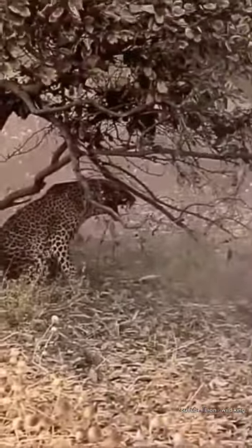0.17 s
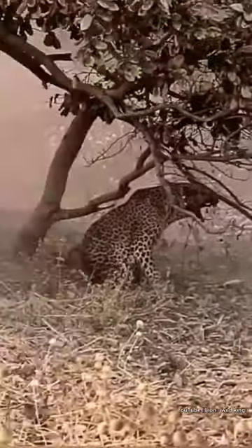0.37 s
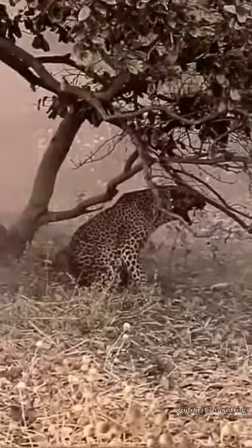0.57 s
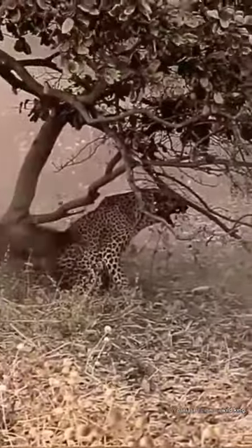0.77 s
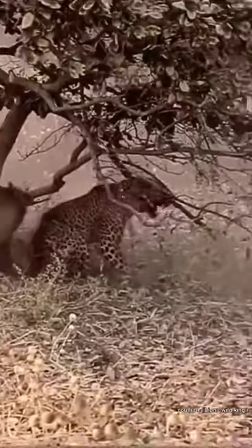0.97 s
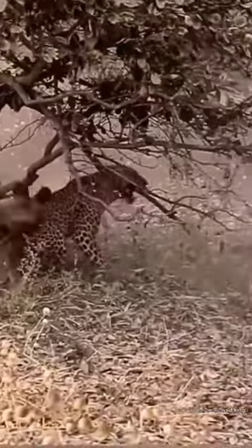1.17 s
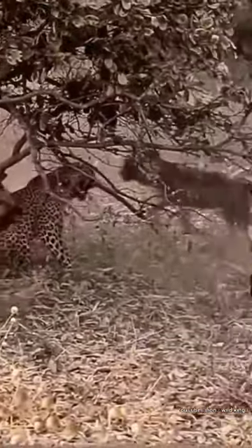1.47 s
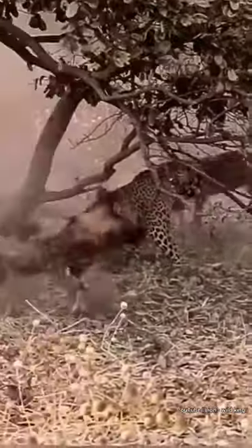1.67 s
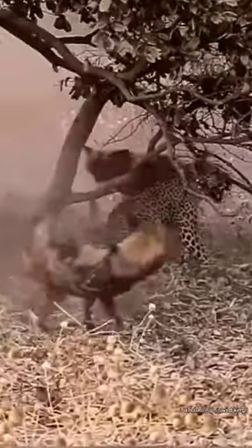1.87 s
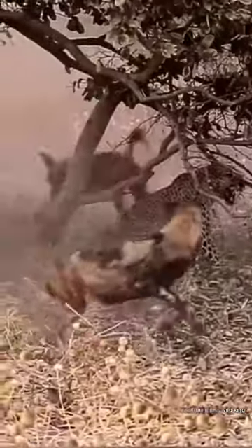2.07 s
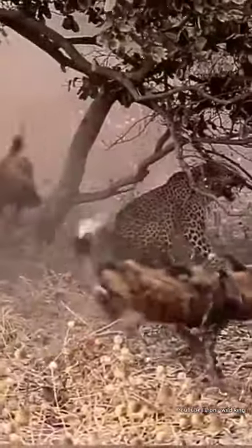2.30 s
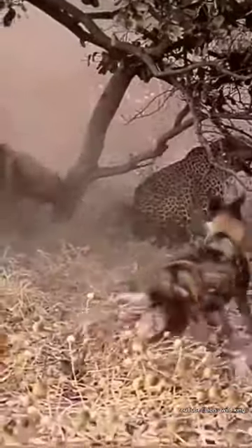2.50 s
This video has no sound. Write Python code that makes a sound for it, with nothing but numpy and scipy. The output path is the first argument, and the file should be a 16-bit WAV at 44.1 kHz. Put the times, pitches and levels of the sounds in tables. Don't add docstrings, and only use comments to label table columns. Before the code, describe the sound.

A pack of wild dogs whimpers, whistles, yelps and yaps in quick shrill bursts, with one wavering whine, then a low pulsing cat growl; paws scuff dry grass, open bush, phone microphone some distance away.

```python
import sys
import numpy as np
from scipy import signal
from scipy.io import wavfile
from scipy.ndimage import uniform_filter1d

SR = 44100
rng = np.random.default_rng(int(sys.argv[2]) if len(sys.argv) > 2 else 0)


def dump_mix(stems):
    frames = np.atleast_2d(stems).T
    limited = np.clip(frames, -1, 1)
    pcm = np.round(limited * 32767).astype(np.int16)
    wavfile.write(sys.argv[1], SR, pcm)


def magnitude_from_level(level_db):
    exponent = np.asarray(level_db, float) / 20
    return 10 ** exponent


N = 116424

# (frequency [Hz], density [dB per Hz])
BUSH_SPECTRUM = [(25, -33), (150, -12), (550, -15), (1300, -4.5), (3900, -13.5), (8600, -9.5),
                 (11500, -5.5), (15500, -43)]
# (time [s], length [s], centre [Hz], level [dB])
RASPS = [(.0, 0.25, 8740, -39.5), (0.391, 0.31, 8930, -42), (1.03, 0.087, 8580, -42.5),
         (0.821, 0.19, 8340, -33.5), (1.131, 0.19, 8560, -33), (1.598, 0.1, 8000, -35),
         (1.719, 0.067, 10800, -38.5), (1.957, 0.279, 8550, -36.5), (2.25, 0.11, 7700, -31),
         (2.362, 0.069, 6510, -28), (2.509, 0.21, 9100, -33)]
# (time [s], length [s], start [Hz], end [Hz], level [dB])
WHIMPERS = [
    (0., 0.04, 964, 900, -22.5),
    (0.106, 0.056, 1055, 924, -23.5),
    (0.525, 0.033, 970, 947, -20.5),
    (2.259, 0.046, 1372, 1444, -20.5),
    (1.865, 0.053, 350, 325, -42),
    (2.3, .04, 1402, 1257, -26.5),
    (2.515, .02, 1190, 1000, -21),
    (2.339, 0.0586, 1016, 1237, -32),
    (2.402, 0.066, 1089, 1057, -30.5),
    (2.485, .11, 899, 997, -28.5),
]
# (time [s], length [s], start [Hz], end [Hz], level [dB])
HIGH_WHISTLES = [(.05, 0.052, 9200, 9210, -19), (.16, 0.015, 7000, 11270, -19),
                 (.2, 0.021, 11560, 5280, -23.5), (.24, 0.0088, 6900, 9700, -4.5),
                 (.47, 0.018, 9580, 7250, -20), (.488, 0.017, 7200, 10470, -17.5),
                 (.795, 0.042, 8010, 9580, -20), (.93, 0.029, 8650, 8700, -18.5),
                 (1.155, 0.11, 7900, 7600, -45), (1.33, 0.021, 9740, 6840, -14.5),
                 (1.7, 0.04, 7500, 9120, -17.5), (2.005, 0.028, 7960, 9120, -11.5),
                 (2.5, 0.034, 9150, 11500, -30), (.125, 0.045, 10500, 10200, -31.5),
                 (.17, 0.033, 10900, 11600, -32.5), (.235, .04, 10600, 9650, -29.5),
                 (.268, 0.022, 9000, 9070, -29.5), (.405, 0.062, 8500, 11970, -28),
                 (.515, 0.061, 11370, 11000, -33), (.595, 0.026, 12200, 12100, -42),
                 (.638, 0.014, 5550, 8900, -26), (.66, 0.023, 7500, 9330, -30),
                 (.82, 0.045, 9200, 9400, -27.5), (1.145, .025, 9250, 8270, -23),
                 (1.21, 0.039, 8230, 7530, -24), (1.23, 0.025, 9300, 9900, -25),
                 (1.365, 0.043, 14600, 9900, -43), (1.81, 0.1, 8300, 8700, -41),
                 (1.705, 0.032, 6750, 5880, -20), (1.995, .06, 5710, 6530, -20)]
# (time [s], length [s], start [Hz], end [Hz], level [dB])
LOW_WHISTLES = [(.21, 0.03, 5360, 5210, -28.5), (.09, 0.032, 6200, 6000, -27),
                (.13, 0.044, 5200, 5430, -33), (.508, 0.02, 6000, 6040, -32),
                (.975, 0.033, 5400, 5340, -29), (1.6, 0.046, 6340, 6390, -40.5),
                (1.79, 0.044, 6170, 6350, -35), (2.08, 0.078, 5000, 5020, -34.5),
                (.885, 0.036, 5200, 5200, -27.5), (.97, 0.054, 7000, 5400, -31),
                (1.185, 0.2, 5160, 5290, -37), (1.73, 0.0607, 5560, 5340, -24.5),
                (2.055, 0.061, 5360, 5490, -21), (2.2, 0.073, 5050, 5380, -25.5),
                (2.36, 0.05, 5490, 5530, -18.5), (2.55, 0.073, 5360, 5075, -29.5)]
# (time [s], start [Hz], level [dB])
SQUEAKS = [
    (0.076, 8350, -18),
    (.325, 8900, -30),
    (0.755, 8380, -11.5),
    (0.99, 5430, -19),
    (1.541, 7960, -15.5),
    (1.617, 8100, -19.5),
    (1.95, 7550, -16),
]
# (time [s], length [s], top [Hz], level [dB])
YELPS = [
    (0.087, 0.036, 1402, -18.5),
    (0.337, 0.052, 1710, -20.5),
    (0.767, 0.056, 1893, -17),
    (1.163, 0.046, 1804, -14.5),
    (1.283, 0.04, 1400, -20),
    (1.552, 0.055, 1884, -15.5),
    (1.633, 0.035, 1401, -20),
    (2.609, 0.022, 1577, -15.5),
]
# (frequency [Hz], level [dB])
THROAT = [(450, -20), (800, -6), (1200, 0), (2200, 0), (4000, -12), (6000, -20), (9000, -50)]
# (time [s], peak [dB])
THUDS = [(.122, -39.5), (.22, -43), (.80, -41), (.835, -39.5), (.87, -37), (.905, -37), (1.775, -39),
         (1.925, -47), (2.0, -39), (2.095, -40), (2.18, -44), (2.309, -33), (2.375, -45), (2.409, -38.5),
         (2.5, -43), (2.548, -39), (2.615, -35)]
# (frequency [Hz], level [dB], t60 [s])
THUD_MODES = [(122, -0.5, 0.077), (166, -11, 0.086), (293, -0.5, 0.059)]
# (time [s], length [s], start [Hz], end [Hz], level [dB])
YAPS = [(.163, 0.03, 1072, 1033, -16), (0.441, .025, 1154, 955, -14.5), (0.835, 0.034, 742.5, 691, -16.5),
        (0.866, 0.047, 641, 596.4, -18.5), (1.349, 0.028, 938, 896, -16.5),
        (1.66, 0.046, 611.4, 531, -19.5), (1.73, 0.032, 950, 1101, -19), (2.626, 0.015, 1530, 1460, -11.5),
        (1.944, 0.048, 1850, 904, -18.5), (2.036, 0.056, 1090, 830, -18), (2.241, 0.043, 1400, 918, -15.5)]
# (time [s], length [s], start [Hz], end [Hz], level [dB])
DULL_YAPS = [
    (0.2343, 0.037, 700, 615, -17.5),
    (0.925, 0.0475, 710, 580, -18.5),
    (2.14, 0.041, 560, 490, -23.5),
    (.852, 0.023, 750, 1000, -20),
    (1.0, 0.0304, 1200, 1350, -33),
]
# (time [s], length [s], pitch [Hz], level [dB])
BARKS = [
    (0.437, 0.0665, 898, -21),
    (0.801, 0.034, 855, -27),
    (1.665, 0.028, 1005, -22.5),
    (0.943, 0.04, 898.4, -19.5),
    (1.257, 0.037, 869.5, -22),
    (1.74, 0.031, 802, -24),
    (1.969, 0.029, 1373, -22),
]
# (time [s], pitch [Hz], level [dB])
WHINE = [
    (.485, 714, -19.5),
    (0.524, 677, -15.5),
    (.565, 713.6, -18.5),
    (.6, 698.6, -21),
    (0.624, 648.3, -20),
    (.665, 665, -13),
    (0.699, 722.6, -17),
    (0.734, 771.5, -15.5),
    (.775, 740, -23),
]
# (time [s], level [dB])
STALK_SNAPS = [(1.010, -27), (1.070, -24.5), (1.104, -28), (1.124, -28), (1.146, -30), (1.862, -25),
               (.609, -34), (.63, -35), (2.228, -24)]
# (time [s], peak [dB])
GROWL = [(1.210, -34), (1.251, -30), (1.300, -26.5), (1.352, -38), (1.390, -26), (1.441, -27.5),
         (1.479, -26), (1.534, -27.5), (1.589, -28.5), (1.655, -29.5), (1.722, -39)]
# (frequency [Hz], level [dB], t60 [s])
GROWL_MODES = [(196, 3.5, 0.041), (350, -4, 0.061)]

BUSH_DB = -35.5
STIR_SHARE = 0.33
ATTACK_S, RELEASE_S, FLUTTER_DB = .008, .008, 2.
TWITTER_SPREAD, TWITTER_DB, TWITTER_ROUGH = .11, -2, .55
SQUEAK_S, SQUEAK_TOP_HZ, SQUEAK_FADE_DB = 0.033, 15500, -36.5
BREATH_DB, EFFORT_DB_PER_OCTAVE = -23, 5
DULLING_DB_PER_OCTAVE = 18
RISE_S = 0.00496
YELP_END_HZ, YELP_SAG_POWER = 789, 3.5
STRAIN_HZ = 1650
TWIG_S, TWIG_DB = .5, -14
SCATTER_GAP_S, SCATTER_T60_S, SCATTER_DB = .004, .17, -10


def walk(rate, size=N):
    k = max(int(SR / rate), 2)
    steps = np.repeat(rng.standard_normal(size // k + 1), k)
    return 1.67 * uniform_filter1d(uniform_filter1d(steps, k), k)[:size]


def read(table, hz):
    table_hz, table_db = np.array(table).T
    return np.interp(np.log(hz), np.log(table_hz), table_db)


def band(x, lo_hz, hi_hz):
    sos = signal.butter(2, [lo_hz, min(hi_hz, .45 * SR)], "band", fs=SR, output="sos")
    return signal.sosfilt(sos, x)


def unit(x):
    return x / np.sqrt(np.mean(x ** 2))


def clock(length):
    return np.arange(int(length * SR)) / SR


def add(out, start, x):
    i = max(int(start * SR), 0)
    out[i:i + len(x)] += x[:N - i]


def swell(t, flutter_db):
    edge = np.clip(t / ATTACK_S, 0, 1) * np.clip((t[-1] - t) / RELEASE_S, 0, 1)
    return np.sin(np.pi / 2 * edge) ** 2 * magnitude_from_level(flutter_db * walk(90.2, size=len(t)))


def ragged(rough, rate, size):
    return 1 - rough + rough * (walk(rate, size=size) + 1j * walk(rate, size=size))


def ground(pack):
    loudness = uniform_filter1d(unit(pack) ** 2, size=3000)
    stir_db = STIR_SHARE * 10 * np.log10(loudness + 0.014)
    out, slow_db = 0, walk(1.88)
    for hz in 25 * 2 ** np.arange(0, 9.4, .5):
        db = read(BUSH_SPECTRUM, hz) + 10 * np.log10(hz)
        db = db + min(hz / 1000, 1) * stir_db + slow_db + 2 * walk(4) + 2.5 * walk(18)
        out = out + magnitude_from_level(db) * unit(band(rng.standard_normal(N), hz / 1.157, hz * 1.066))
    return magnitude_from_level(BUSH_DB) * unit(out)


def whistle(hz, jitter, rough):
    n = len(hz)
    phase = 2 * np.pi * np.cumsum(hz * (1 + jitter * walk(125, size=n))) / SR
    return unit(np.real(ragged(rough, 900, n) * np.exp(1j * phase)))


def rasps(out):
    for start, length, hz, db in RASPS:
        t = clock(length)
        hiss = band(rng.standard_normal(len(t)), hz * 0.84, hz * 1.16)
        hiss = unit(band(hiss, hz * 0.28, hz * 3.8))
        add(out, start, magnitude_from_level(db) * swell(t, 0.65) * hiss)
        for shift in (.8, 1, 1.17):
            flip = np.tanh(3 * walk(70, size=len(t)))
            twitter = whistle(hz * shift * np.exp(TWITTER_SPREAD * flip), .015, TWITTER_ROUGH)
            level = magnitude_from_level(db + TWITTER_DB + 2.7 * walk(42.9, size=len(t)))
            add(out, start, level * swell(t, 3.38) * twitter)


def voice(hz, tilt_db, rough, jitter, mouth_hz, mouth_db):
    n = len(hz)
    phase = 2 * np.pi * np.cumsum(hz * (1 + jitter * walk(138.3, size=n))) / SR
    slope_db = tilt_db + DULLING_DB_PER_OCTAVE * np.log2(hz / hz.max())
    out = 0
    for k in range(1, 11):
        mouth = mouth_db * np.exp(-(np.log(k * hz / mouth_hz) / .22) ** 2)
        db = read(THROAT, k * hz) + slope_db * np.log2(k) + mouth
        tone = ragged(rough, 500, n) * np.exp(1j * (k * phase + .5 * k ** 2))
        out = out + magnitude_from_level(db + 2 * walk(40, size=n)) * np.real(tone)
    breath = unit(band(rng.standard_normal(n), 800, 4500))
    return unit(out) + magnitude_from_level(BREATH_DB + 40 * rough) * breath


def calls(out, rows, sag, rise, *colour):
    for start, length, a, b, db in rows:
        t = clock(length)
        hz = (a + (b - a) * (t / length) ** sag) * (1 - rise * np.exp(-t / RISE_S))
        level = magnitude_from_level(db + EFFORT_DB_PER_OCTAVE * np.log2(hz / a))
        add(out, start, level * swell(t, FLUTTER_DB) * voice(hz, *colour))


def whimpers(out):
    calls(out, WHIMPERS, 0.882, 0.053, -16.0, 0.13, 0.0295, 1000, 0)


def whistles(out):
    for rows, jitter, rough in ((HIGH_WHISTLES, .02, .45), (LOW_WHISTLES, .007, .25)):
        for start, length, a, b, db in rows:
            t = clock(length)
            tone = whistle(a + (b - a) * t / length, jitter, rough)
            add(out, start, magnitude_from_level(db) * swell(t, FLUTTER_DB) * tone)


def squeaks(out):
    for start, a, db in SQUEAKS:
        t = clock(SQUEAK_S)
        u = np.clip(t / SQUEAK_S - .25, 0, 1) / 0.71
        hz = a + (SQUEAK_TOP_HZ - a) * (0.11 * t / SQUEAK_S + 0.75 * (1 - (1 - u) ** 3))
        level = magnitude_from_level(db + SQUEAK_FADE_DB * u ** 0.49)
        add(out, start, level * swell(t, 0.5) * whistle(hz, 0.0073, 0.4))


def yelps(out):
    rows = [(start, length, top, YELP_END_HZ, db) for start, length, top, db in YELPS]
    strained = [row for row in rows if row[2] > STRAIN_HZ]
    relaxed = [row for row in rows if row[2] <= STRAIN_HZ]
    calls(out, strained, YELP_SAG_POWER, .16, 2., .13, .008, 5500, 5.)
    calls(out, relaxed, 2.05, 0.043, -5., .14, 0.0098, 1400, 0)


def knocks(rows, modes, attack_s, gain_db):
    out, t = np.zeros(N), clock(.15)
    for start, db in rows:
        ring = 0
        for hz, mode_db, t60 in modes:
            c = rng.standard_normal()
            tone = np.sin(2 * np.pi * hz * (1 + 0.046 * c) * t)
            ring = ring + magnitude_from_level(mode_db + 0.5 * c) * tone * 1000 ** (-t / max(t60, .01))
        add(out, start, magnitude_from_level(db + gain_db) * ring * np.clip(t / attack_s, 0, 1))
    return out


def thuds():
    return knocks(THUDS, THUD_MODES, attack_s=0.0027, gain_db=2.5)


def yaps(out):
    calls(out, YAPS, 1.2, .02, -1., .18, .014, 2050, 6.)
    calls(out, DULL_YAPS, .6, .01, -3.5, .1, .008, 1300, 5.)


def barks(out):
    rows = [(start, length, hz, hz, db) for start, length, hz, db in BARKS]
    calls(out, rows, 1., 0.1124, 0.55, 0.33, 0.0242, 1115, 21.0)


def whine(out):
    times, pitches, levels = np.array(WHINE).T
    t = clock(times[-1] - times[0])
    hz = np.interp(t + times[0], times, pitches)
    level = magnitude_from_level(np.interp(t + times[0], times, levels))
    tone = voice(hz, tilt_db=2, rough=.13, jitter=.004, mouth_hz=2050, mouth_db=9)
    add(out, times[0], level * swell(t, FLUTTER_DB) * tone)


def snaps(out):
    t = clock(.012)
    crack = unit(band(rng.standard_normal(len(t)), 60, 4000))
    add(out, TWIG_S, magnitude_from_level(TWIG_DB) * crack * np.exp(-t / 0.0018))
    for start, db in STALK_SNAPS:
        tick = unit(band(rng.standard_normal(len(t)), 4500, 11000))
        add(out, start, magnitude_from_level(db) * tick * np.exp(-t / 0.0019))


def growl():
    return knocks(GROWL, GROWL_MODES, attack_s=0.0033, gain_db=0.5)


def scatter(pack):
    t = clock(.5)
    tail = rng.standard_normal(len(t)) * 1000 ** (-t / SCATTER_T60_S) * (t > SCATTER_GAP_S)
    return magnitude_from_level(SCATTER_DB) * signal.fftconvolve(pack, tail / np.sqrt(np.sum(tail ** 2)))[:N]


def scene():
    pack = np.zeros(N)
    for source in (rasps, whimpers, whistles, squeaks, yelps, yaps, barks, whine, snaps):
        source(pack)
    return (pack + scatter(pack) + thuds() + growl() + ground(pack))[None]


def roll_off(x):
    return signal.sosfilt(signal.butter(12, 15720, fs=SR, output="sos"), x)


def record(dry):
    rounded = np.tanh(0.87 * dry) / 0.93
    return roll_off(band(rounded, 37, 16000))


dry = scene()
out = record(dry)
dump_mix(out)
```